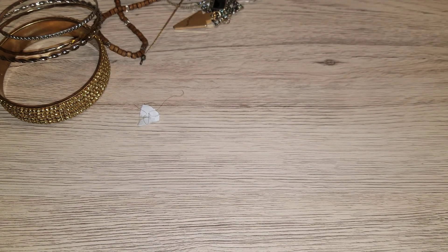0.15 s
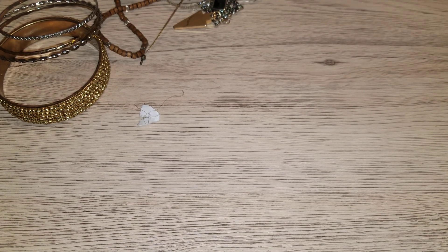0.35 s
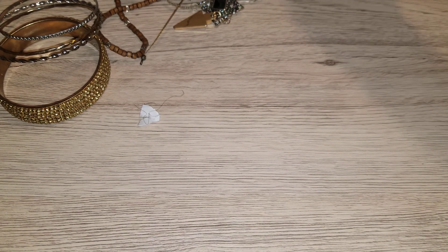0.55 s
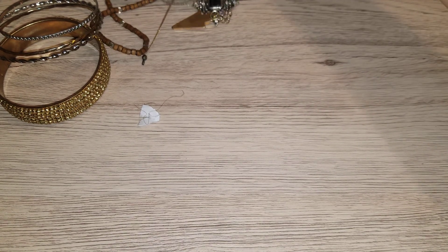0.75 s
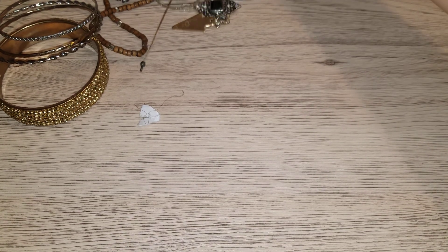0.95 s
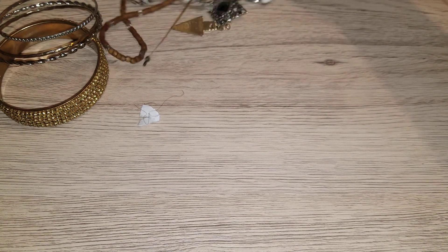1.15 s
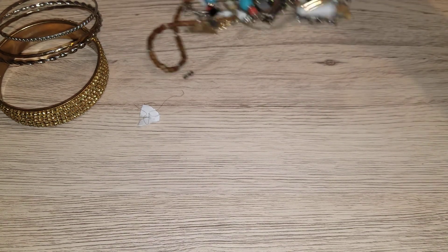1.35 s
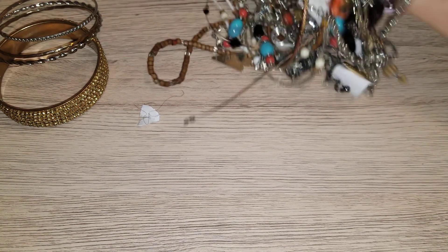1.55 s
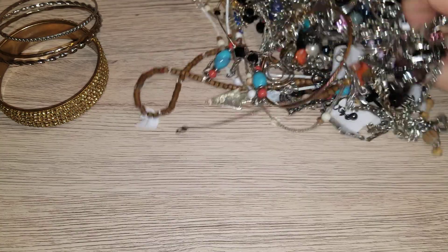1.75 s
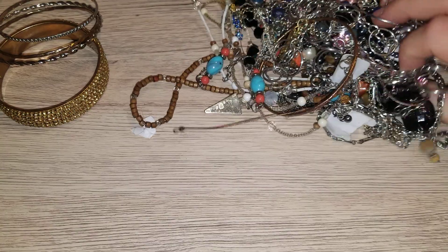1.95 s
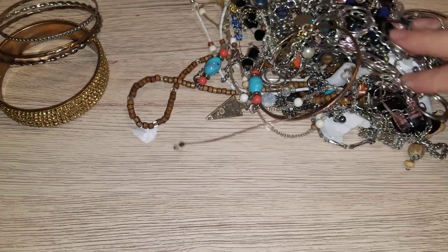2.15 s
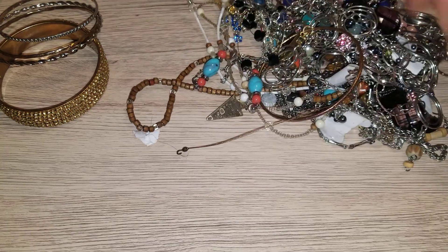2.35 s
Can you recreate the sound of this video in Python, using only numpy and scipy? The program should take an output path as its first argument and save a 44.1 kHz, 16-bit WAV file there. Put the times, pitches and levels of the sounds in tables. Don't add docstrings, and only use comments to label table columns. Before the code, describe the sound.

Jewelry rattle: metal chains, beads and charms clatter and scrape over a wooden tabletop, then settle.

```python
import sys
import numpy as np
from scipy import signal
from scipy.fft import rfft, irfft, next_fast_len
from scipy.io import wavfile

SR = 44100
rng = np.random.default_rng(int(sys.argv[2]) if len(sys.argv) > 2 else 0)


def file_out(sig):
    cols = np.atleast_2d(sig).T
    lim = np.clip(cols, -1, 1)
    pcm = np.round(lim * 32767).astype(np.int16)
    wavfile.write(sys.argv[1], SR, pcm)


def level_to_linear(level):
    exponent = np.asarray(level, float) / 20
    return 10 ** exponent


N = 110250

# mode_hz [Hz], level_db [dB], t60_s [s]
BOARD_MODES = [(129.5, -7.5, 0.052), (208, -10, 0.064), (280, 2, 0.026), (358, 2.5, 0.04),
               (410, 0.5, 0.048), (507, -3.5, 0.059), (573, -11.5, 0.25), (640, 4, 0.019), (690, 3, 0.024),
               (807, 1.5, 0.017), (1162, -3.5, 0.017)]
PORT_LAG_S = 0.00031
BOARD_LAG_SHARE = 0.3


def rms_one(x):
    return x / np.sqrt(np.mean(x ** 2) + 1e-20)


def in_time(rows):
    start_s, *columns = np.transpose(rows)
    t = np.arange(N) / SR
    return [np.interp(t, start_s, column) for column in columns]


def at_hz(points, hz):
    points_hz, level_db = np.array(points).T[:2]
    return np.interp(np.log(hz), np.log(points_hz), level_db)


def band(x, kind, hz, order=2):
    return signal.sosfilt(signal.butter(order, hz, kind, fs=SR, output="sos"), x)


def drift(rate_hz):
    r = np.exp(-2 * np.pi * rate_hz / SR)
    settled = signal.lfilter([1], [1, -2 * r, r * r], rng.standard_normal(N + SR))[SR:]
    return rms_one(settled)


def ring(clicks, hz, t60_s):
    r = level_to_linear(-60 / (t60_s * SR))
    w = 2 * np.pi * min(hz, SR / 2.2) / SR
    return signal.lfilter([0, np.sin(w)], [1, -2 * r * np.cos(w), r * r], clicks + 1e-18)


def coloured(spectrum):
    hz = np.maximum(np.fft.rfftfreq(N, 1 / SR), 1)
    white = rng.standard_normal((2, N))
    return rms_one(irfft(rfft(white) * level_to_linear(at_hz(spectrum, hz)), N))


def place(at, sizes, side, share=1):
    pan_db = 9.5
    out = np.zeros((2, N))
    lag = side * share * PORT_LAG_S * SR / 2
    for port, sign in enumerate((1, -1)):
        index = np.clip(at + sign * lag, 0, N - 1).astype(int)
        np.add.at(out[port], index, sizes * level_to_linear(-sign * side * share * pan_db / 2))
    return out


def contacts(per_s, spread_db, clump_db, bodies, share=1):
    clumps = level_to_linear(clump_db * (drift(60) + drift(12)))
    born = rng.random(N) < per_s * clumps / SR
    sizes = level_to_linear(spread_db * np.minimum(rng.exponential(1, N), 5)) * rng.choice([-1, 1], N)
    side = rng.choice([-1, 1], N) * (1 + 0.22 * rng.standard_normal(N))
    dealt = rng.integers(0, bodies, N)
    for body in range(bodies):
        at = np.flatnonzero(born & (dealt == body))
        yield place(at, sizes[at], side[at], share)


def board(trains):
    total = 0
    for k, (train, (mode_hz, level_db, t60_s)) in enumerate(zip(trains, BOARD_MODES)):
        total = total + (-1) ** k * level_to_linear(level_db) * ring(train, mode_hz, t60_s)
    return band(total, "band", [110, 5000])


def heap():
    # start_s [s], rattle_db [dB], board weight_db and fine_db [dB re rattle]
    pulls = [
        [(0.621, -48.5, 0.5, 4), (0.636, -37.5, -2.5, -15), (0.654, -40.5, -8.5, -7.5), (0.758, -35, -6, -4),
         (0.788, -41, -8, 0), (0.798, -41.5, -13, 1), (0.82, -53.5, 0, 3), (0.846, -51, -11, 11.5),
         (0.88, -52.5, -10, -1), (0.887, -44, -17, -3)],
        [(0.92, -53, -2, 6.5), (0.934, -38, -6.5, -2), (1.004, -40.5, -6, 0), (1.054, -32.5, -9, -4),
         (1.086, -37.5, -4.5, -2.5), (1.28, -34.5, -6.5, -3), (1.458, -28, -2.5, -3), (1.746, -32, 0.5, -6),
         (1.8, -41, -4, -0.5)],
        [(1.82, -45, -3, -2.5), (2.03, -44, -2.5, 3), (2.078, -52.5, -4.5, 0), (2.092, -49.5, -4, 6),
         (2.143, -60, -1, 0), (2.147, -44.5, -3, -0.5), (2.178, -51, 4, 1), (2.2, -47.5, -1.5, -1),
         (2.318, -55.5, -3.5, 7.5), (2.36, -59.5, -9, -2), (2.384, -71, 9, 5), (2.487, -88, -16, 15),
         (2.491, -65.5, 7.5, 14)],
    ]
    # pitch_hz [Hz], level_db [dB per Hz]
    rattle_colour = [(530, -30), (900, -41), (1410, -3), (2730, -3), (3550, -8), (4150, -2), (9200, -8),
                     (12600, 1.5), (16000, 0)]
    rate_follows = 0.2
    rows = [row for pull in pulls for row in pull]
    silent_start = (rows[0][0] - 0.004, -110, 0, 0)
    rattle_db, weight_db, fine_db = in_time([silent_start] + rows)

    t = np.arange(N) / SR
    pitches = np.geomspace(1000, 15800, 36) * np.exp(0.015 * rng.standard_normal(36))
    per_s = 20000 * level_to_linear(rate_follows * np.clip(rattle_db + 36.5, -25, 0))
    trains = contacts(per_s, 2.4, 2.1, len(pitches))
    ticks = []
    for train, hz in zip(trains, pitches):
        patch_db = 2.2 * np.sin(rng.uniform(20, 70) * t + hz)
        level = level_to_linear(at_hz(rattle_colour, hz) + patch_db) * hz ** 0.75
        ticks.append(level * ring(train, hz, 0.007 * np.sqrt(1000 / hz)))

    even = level_to_linear(-rate_follows / 2 * np.clip(rattle_db + 34, -25, 0))
    split = np.searchsorted(pitches, 10300)
    beads = rms_one(even * sum(ticks[:split]))
    fine_chain = rms_one(even * sum(ticks[split:]))

    bumps = list(contacts(1500, 3.2, 1.6, 3, BOARD_LAG_SHARE))
    rumble = rms_one(board(bumps[k % 3] for k in range(len(BOARD_MODES))))
    return level_to_linear(rattle_db) * (beads + level_to_linear(fine_db) * fine_chain + level_to_linear(weight_db) * rumble)


def clacks():
    # start_s [s], peak_db [dB], low_hz [Hz], high_hz [Hz], knock_db [dB re peak]
    hard_clacks = [(0.6364, -24, 1980, 5850, -14), (0.6685, -32, 4500, 15900, -25),
                   (0.8851, -32.5, 8000, 15900, -13.5), (0.9381, -23.5, 2600, 9100, -19),
                   (0.9922, -27.5, 11500, 13500, 0.5), (1.05, -21.5, 2620, 8200, -15),
                   (1.0634, -19.5, 4000, 13000, -22), (1.4513, -15.5, 2960, 13600, -7),
                   (1.577, -13, 4100, 14600, -15), (1.6668, -18, 1000, 4800, -5),
                   (1.6943, -16, 2970, 10800, -12), (1.8387, -28.5, 3080, 15300, -24),
                   (2.0714, -32, 3000, 9000, -10.5), (2.0859, -34.5, 1190, 10100, -0.5),
                   (2.099, -28.5, 5140, 15900, -32), (2.146, -38.5, 2460, 9500, -17),
                   (2.187, -30.5, 2000, 12000, -20), (2.2015, -33, 1500, 7000, -13),
                   (2.2441, -33.5, 10000, 16600, -7.5), (2.3561, -33, 5070, 14100, -22),
                   (2.4889, -41, 6000, 15800, -13)]
    # start_s [s], peak_db [dB], low_hz [Hz], high_hz [Hz]
    taps = [(0.6139, -38, 5950, 15900), (.661, -42, 3000, 9000), (.6935, -40, 6000, 15900),
            (0.7783, -45, 8000, 15900), (0.8408, -39.5, 1300, 2800), (0.9778, -22.5, 8100, 15900),
            (1.2007, -22, 4550, 15300), (1.228, -19, 9600, 15000), (1.303, -26.5, 12500, 15900),
            (1.361, -17, 5000, 15900), (1.4037, -22.5, 2000, 7030), (1.621, -31, 1500, 5000),
            (1.6585, -21.5, 11000, 15900), (1.663, -29, 9600, 14000), (1.759, -23.5, 11000, 15900),
            (1.9053, -28, 9000, 13900), (1.9435, -30, 9000, 15000), (1.975, -48, 3020, 9000),
            (2.0445, -35, 4500, 14000), (2.0595, -33, 7000, 15000), (2.12, -42, 5000, 15900),
            (2.1584, -31, 6340, 8900), (2.184, -35, 7100, 15900), (2.2205, -45, 9000, 15900),
            (2.238, -41, 12500, 15900), (2.3075, -50, 11000, 15900), (2.3136, -46, 11000, 16000),
            (2.3275, -39, 5000, 7600), (2.342, -47, 11000, 15900), (2.3655, -44, 7000, 15900),
            (2.3785, -49, 4000, 16000), (2.4003, -45.5, 5100, 15900), (2.4443, -55.5, 5100, 15000)]
    # start_s [s], peak_db [dB], low_hz [Hz], high_hz [Hz]
    slips = [
        (0.639, -37, 2000, 4970),
        (0.797, -35, 2550, 9000),
        (1.462, -23.5, 2520, 7560),
        (1.582, -37, 3000, 14000),
        (1.672, -22, 890, 4970),
        (1.955, -30, 4000, 15000),
        (1.964, -28.5, 2590, 15200),
        (2.007, -31, 4000, 15000),
        (2.018, -34.5, 3000, 14000),
        (2.349, -46, 2300, 6000),
    ]
    # mode_hz [Hz], level_db [dB], t60_s [s]
    bead_modes = [(1150, -12, .008), (2800, -8, .006), (3500, -7, .005), (4150, -4, .005), (5150, -3, .004),
                  (6400, -1, .003), (7700, 1, .003), (11500, 2, .002), (14200, 2, .002)]
    scatter_db = 3.0
    off_pitch_db_per_oct = 12.0
    clack_s, tap_s, slip_s = 0.0022, 0.0012, 0.012
    rows = [(*clack, clack_s) for clack in hard_clacks]
    rows += [(*tap, -40, tap_s) for tap in taps]
    rows += [(*slip, -40, slip_s) for slip in slips]

    out = np.zeros((2, N + SR))
    knocks = np.zeros((len(BOARD_MODES), 2, N))
    for start_s, peak_db, low_hz, high_hz, knock_db, length_s in rows:
        side = np.sign(rng.standard_normal())
        late_s = np.abs(rng.standard_normal(40)) * length_s
        late_s[0] = 0
        kick = rng.standard_normal(40)
        sizes = (np.sign(kick) + kick / 2) * np.exp(-late_s / length_s)
        burst = place((late_s + PORT_LAG_S) * SR, sizes, side)[:, :SR // 12]

        beads = 0
        for mode_hz, level_db, t60_s in bead_modes:
            octaves_off = abs(np.log2(mode_hz / np.clip(mode_hz, low_hz, high_hz)))
            mode_db = level_db + scatter_db * rng.standard_normal() - off_pitch_db_per_oct * octaves_off
            beads = beads + level_to_linear(mode_db) * ring(burst, mode_hz, t60_s)
        clack = band(burst + level_to_linear(-19) * beads, "band", [low_hz, high_hz])
        first = int((start_s - PORT_LAG_S) * SR)
        peak = np.abs(clack.mean(axis=0)).max()
        out[:, first:first + burst.shape[1]] += level_to_linear(peak_db + 0.5) * clack / peak

        hit = place(np.array([start_s * SR]), level_to_linear(peak_db + knock_db - 7), side, BOARD_LAG_SHARE)
        knocks += hit * level_to_linear(scatter_db * rng.standard_normal((len(BOARD_MODES), 1, 1)))
    return out[:, :N] + board(knocks)


def clinks():
    touches = [
        (0.6375, -24, 2970, 0.025),
        (0.6356, -33, 4020, 0.032),
        (0.934, -36, 2830, .04),
        (2.35, -50, 4200, 0.066),
        (2.35, -52, 2900, 0.05),
        (2.488, -45, 11900, .04),
        (2.489, -45, 14500, 0.023),
        (2.489, -64.5, 4370, .08),
    ]
    return sum(ring(place(np.array([start_s * SR]), level_to_linear(level_db), 0.5), pitch_hz, t60_s)
               for start_s, level_db, pitch_hz, t60_s in touches)


def charm():
    shakes = [
        (.993, .029, -46),
        (1.226, .07, -48),
        (1.32, .07, -50),
        (1.05, .6, -58),
        (1.53, .06, -46),
    ]
    # pitch_hz [Hz], level_db [dB], t60_s [s]
    charm_rings = [(12500, 3, 0.014), (12650, 0, 0.012)]
    t = np.arange(N) / SR
    shaken = sum(level_to_linear(level_db) * ((t > start_s) & (t < start_s + length_s))
                 for start_s, length_s, level_db in shakes)
    touches = contacts(1500, 2.2, 2.5, len(charm_rings))
    return sum(level_to_linear(level_db) * ring(train * shaken, pitch_hz, t60_s)
               for train, (pitch_hz, level_db, t60_s) in zip(touches, charm_rings))


def thumps():
    presses = [
        (0.624, -34.5),
        (0.699, -52),
        (0.928, -37),
        (1.106, -38.5),
        (1.187, -38.5),
        (1.399, -34),
        (1.469, -36.5),
    ]
    start_s, peak_db = np.transpose(presses)
    pushes = place(start_s * SR, level_to_linear(peak_db), 0.14)
    return band(ring(pushes, 141.4, 0.14), "band", [60, 174])


def room(x):
    t60_s, wall_cut_hz = 0.12, 4900
    size = next_fast_len(N + SR)
    hz = np.fft.rfftfreq(size, 1 / SR)
    lags_s = rng.uniform(0.004, 0.02, (6, 2, 1))
    walls = level_to_linear(-60 * lags_s / t60_s) / (1 + 1j * hz / wall_cut_hz)
    loop = walls * np.exp(-2j * np.pi * hz * lags_s)
    echoes = np.sum(loop / (1 - loop), axis=0)
    return irfft(rfft(x, size) * echoes, size)[:, :N]


def background():
    # start_s [s], level_db [dB]
    drone_level = [(0.0, -62), (0.14, -71.5), (0.72, -53), (0.78, -62), (1.06, -60.5), (1.27, -55.5),
                   (1.55, -53.5), (1.66, -81), (1.7, -62), (2.5, -60)]
    # pitch_hz [Hz], level_db [dB], pan_db [left-right dB]
    drone_tones = [(46.3, 2.9, 0.5), (61.5, -20, -1), (87.4, -10.5, 5), (133.8, -14.5, 1)]
    # pitch_hz [Hz], level_db [dB per Hz]
    rumble_colour = [(18, -47), (33, -14), (49, -7.5), (128, -15.5), (211, -24.5), (357, -28.5),
                     (900, -47.5), (1170, -85), (1980, -120)]
    # pitch_hz [Hz], level_db [dB per Hz]
    hiss_colour = [(410, -8), (700, -6), (1420, -8.5), (1970, -7.5), (2080, -11), (4920, -13),
                   (8650, -15.5), (11700, -8), (16000, -1.5)]
    t = np.arange(N) / SR
    ports = np.array([[0.5], [-0.5]])
    drone = 0
    for pitch_hz, level_db, pan_db in drone_tones:
        level = level_to_linear(level_db + 1.5 + 2 * drift(4.9) + pan_db * ports)
        phase = 2 * np.pi * pitch_hz * t + 0.5 * drift(3.5) + 0.41 * ports
        drone = drone + level * np.sin(phase)
    mid, side = band(coloured(rumble_colour), "high", 38, order=4)
    rumble = level_to_linear(-6) * (mid + 1.6 * side * ports)
    loudness_db, = in_time(drone_level)
    hiss = level_to_linear(-71) * coloured([(250, -10)] + list(hiss_colour))
    return level_to_linear(loudness_db) * (drone + rumble) + hiss


def scene():
    near = heap() + clacks() + clinks() + charm() + thumps()
    highs = band(near, "high", 810)
    return near + level_to_linear(-13.5) * room(highs) + background()


def top_cut(x):
    return signal.sosfilt(signal.butter(12, 16990, fs=SR, output="sos"), x)


def record(dry):
    dip_hz, dip_width_hz, dip_share = 9200, 1500, 0.4
    r = np.exp(-np.pi * dip_width_hz / SR)
    w = 2 * np.pi * dip_hz / SR
    resonance = signal.lfilter([(1 - r * r) / 2, 0, (r * r - 1) / 2], [1, -2 * r * np.cos(w), r * r], dry)
    x = dry - dip_share * resonance
    bass = band(x, "low", 1500, order=1)
    x = x + bass * (level_to_linear(2.5 * np.array([[-0.5], [0.5]])) - 1)
    finished = signal.sosfilt(signal.cheby2(16, 45, 16000, fs=SR, output="sos"), x)
    return top_cut(finished)


dry = scene()
out = record(dry)
file_out(out)
```